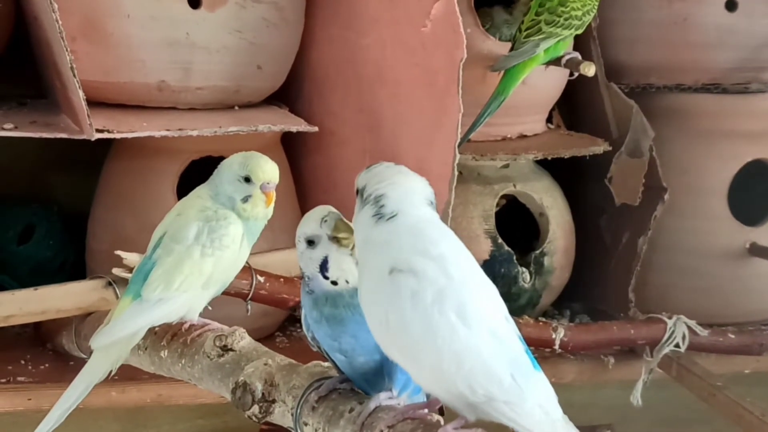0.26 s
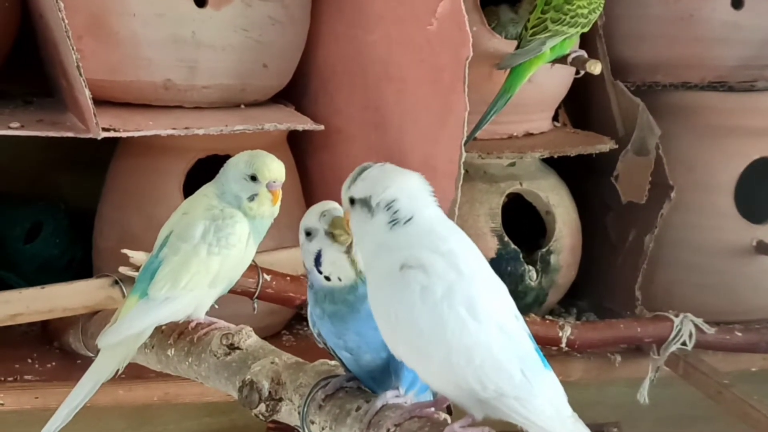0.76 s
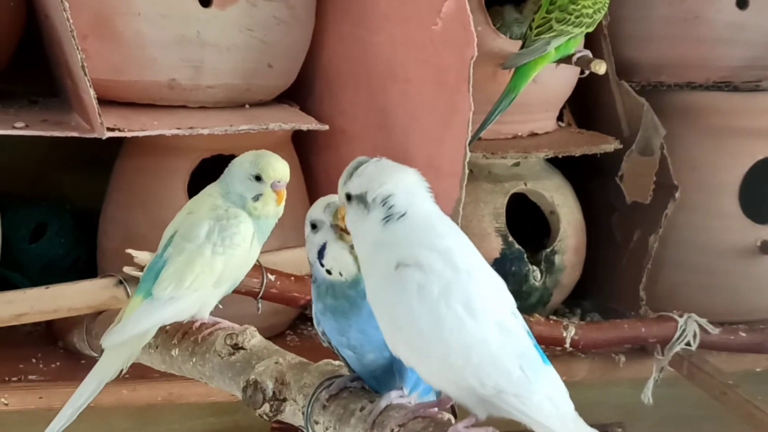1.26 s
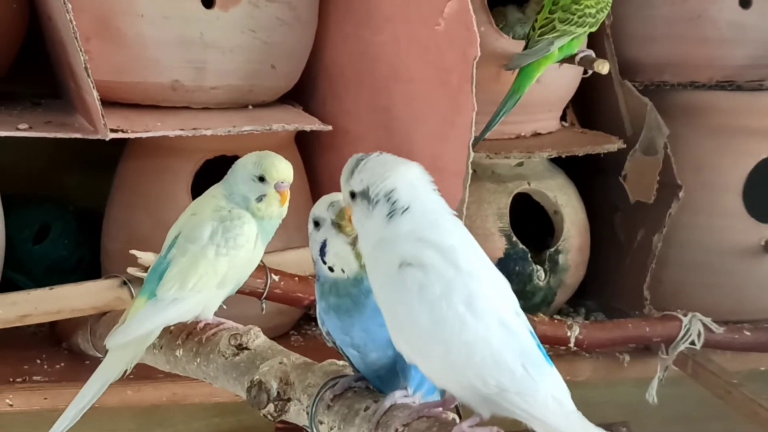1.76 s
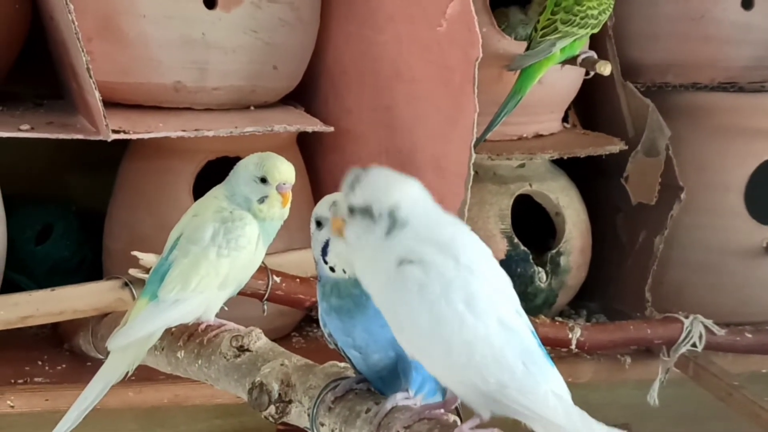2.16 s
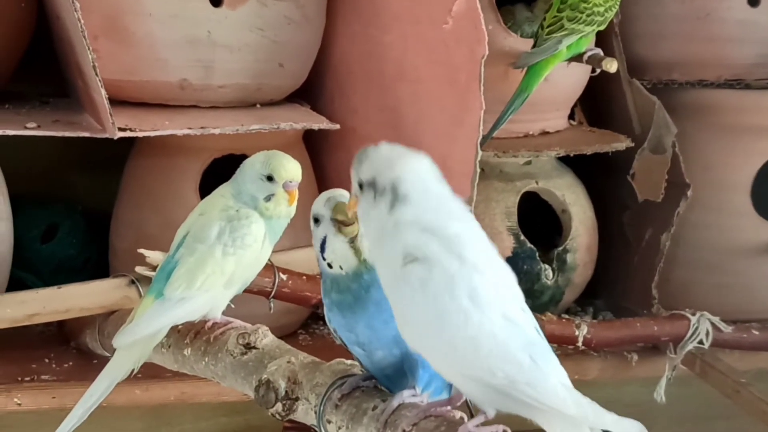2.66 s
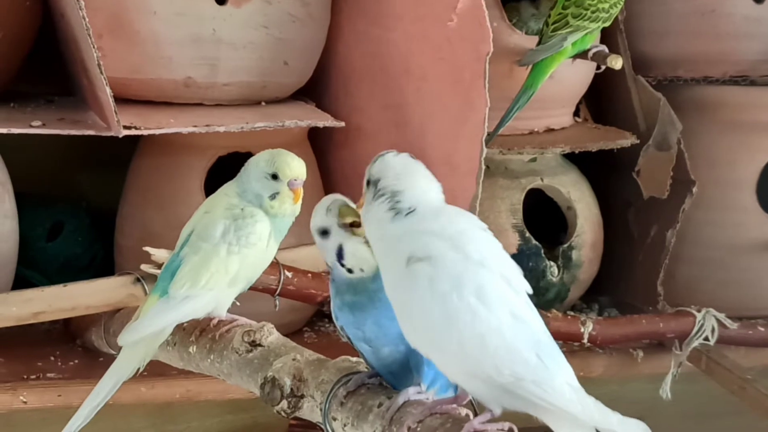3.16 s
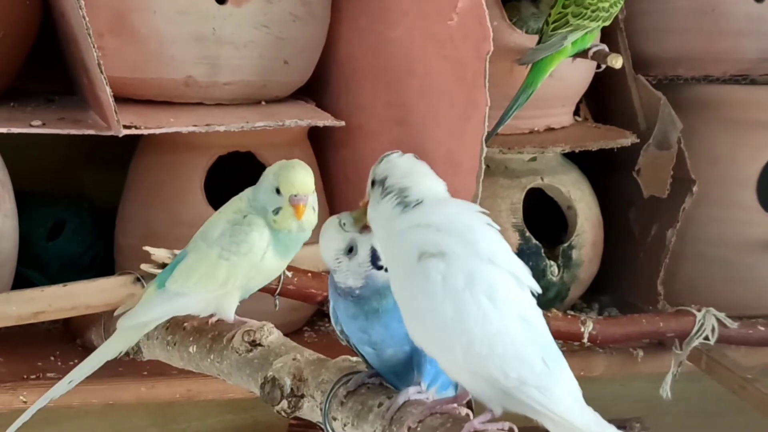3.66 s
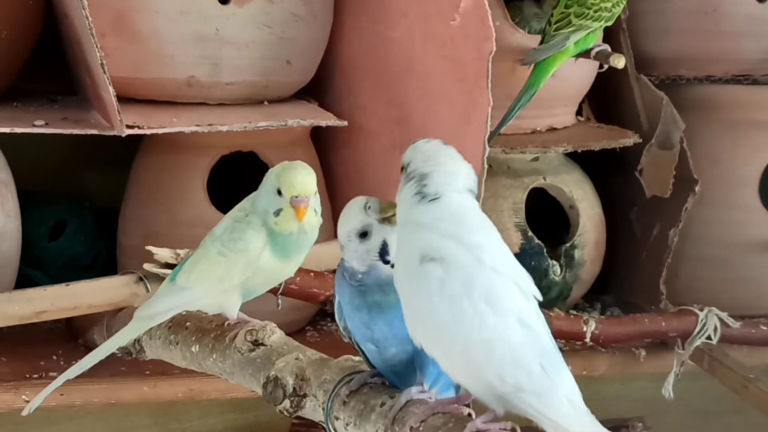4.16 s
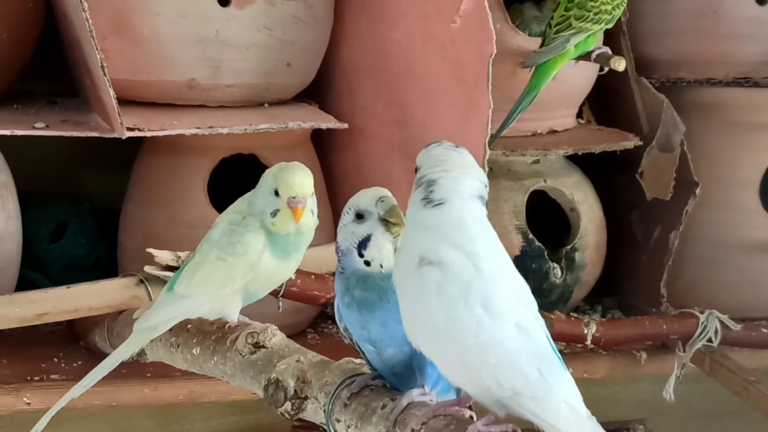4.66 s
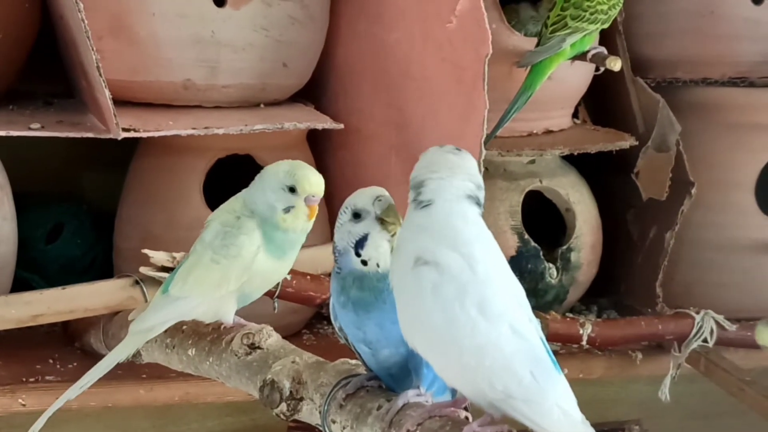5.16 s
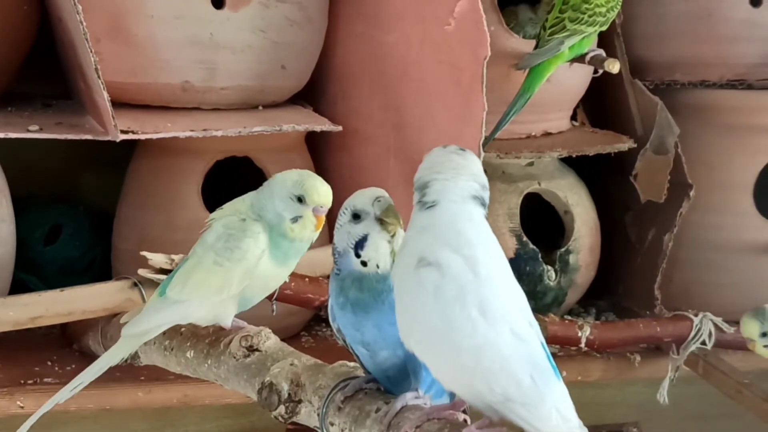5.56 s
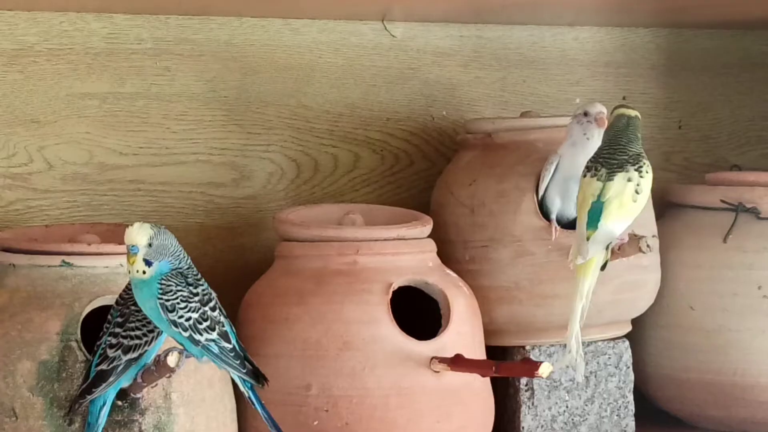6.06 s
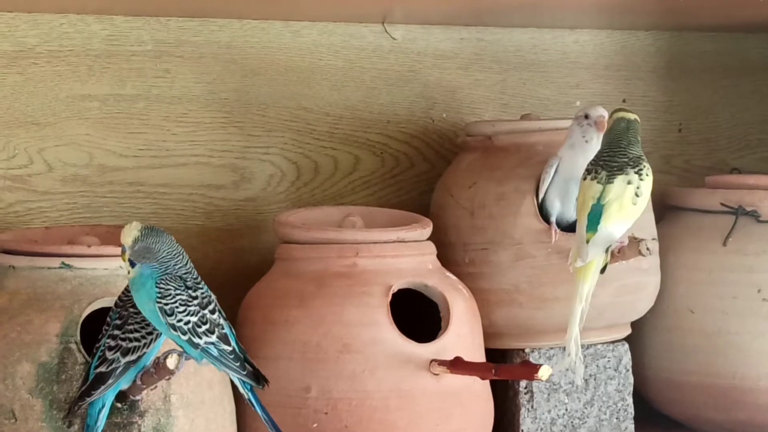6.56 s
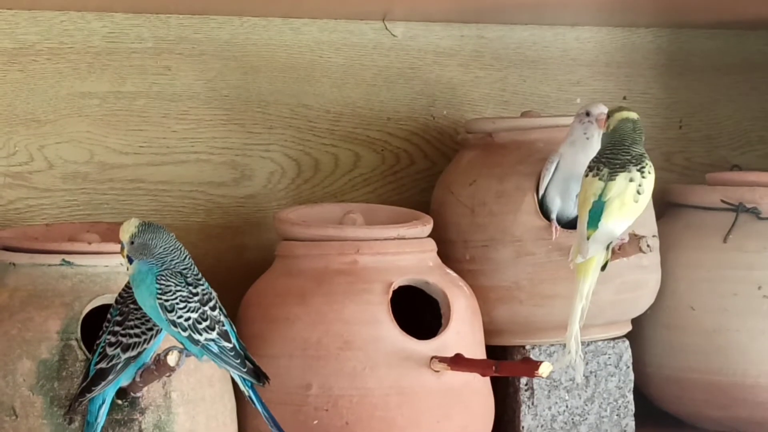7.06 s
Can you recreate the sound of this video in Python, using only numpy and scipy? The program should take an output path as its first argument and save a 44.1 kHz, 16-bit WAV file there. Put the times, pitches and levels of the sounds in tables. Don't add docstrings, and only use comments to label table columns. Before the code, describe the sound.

An aviary heard through a nearby phone microphone: steady airy hiss, a distant chirping flock and low, uneven wind puffs. A puff and short croak open, with a faint dove coo. From 0.3 to 1.7 seconds a near bird gives scratchy, buzzing rasps in quick succession, among soft whistles and dry beak ticks around 1.5. High fluttering trills start at 2.1 on the left and move to centre, answered ahead near 2.5. A clear whistle sounds left at 2.6, then a very loud, fast-gliding shriek at 2.7-2.85. Rasps return around 3-3.4, warbles fill 3.2-4.1, and more rasps run from 4.0 to 4.5. Wind thuds strongest at 4.6. Hard pecks come at 4.8 and 5.4, with a squawk near 5.5. Croaks, peeps and twitters continue from 5.9, ending with a bright chirp and falling squawk around 7.05 and small peeps. Hard walls and pots add brief echoes.

```python
import sys
import numpy as np
from scipy import signal
from scipy.io import wavfile
from scipy.ndimage import uniform_filter1d, minimum_filter1d

SR = 44100
rng = np.random.default_rng(int(sys.argv[2]) if len(sys.argv) > 2 else 0)


def unload_audio(sound):
    columns = np.transpose(np.atleast_2d(sound))
    steps = np.round(np.clip(columns, -1, 1) * 32767)
    wavfile.write(sys.argv[1], SR, steps.astype(np.int16))


def convert_level_to_amplitude(level_db):
    exponent = np.asarray(level_db, float) / 20
    return 10 ** exponent


N = 321489

# frequency in Hz, density in dB per Hz.
HISS_SPECTRUM = [(210, -62), (350, -41), (483, -23), (586, -5.5), (771, 2.5), (1450, 0), (1700, 2),
                 (2200, -2.5), (3340, -1.5), (5000, -3), (7490, -3), (15200, -10.5), (16500, -23)]
# frequency in Hz, likeness 0-1.
HISS_LIKENESS = [(300, 0.72), (600, 0.45), (2000, 0.67), (6000, 0.15), (14000, 0.062)]
# frequency in Hz, level in dB.
FAR_TONE = (1726, -55.5)
HISS_DB = -38
# peak in seconds, rise in seconds, fall in seconds, thud in dB, flutter in dB.
GUSTS = [
    (0.0, 0.02, 0.065, -45, -51),
    (0.45, 0.31, 0.65, -54.5, -56.5),
    (0.88, 0.44, 0.27, -48, -51),
    (1.97, 0.43, 0.3, -51.5, -54),
    (3.3, 0.76, 0.97, -65, -61),
    (4.22, 0.11, 1, -52.5, -51.5),
    (4.6, 0.42, 0.18, -41.5, -49.5),
    (5.15, 0.12, 0.14, -59, -56.5),
    (5.95, 0.082, 0.79, -63.5, -65),
    (7.1, 0.17, 0.12, -67, -59.5),
]
# thud in dB, flutter in dB.
CALM_DB = (-70, -71)
GUST_DROP_DB = -18.5
LULL_S, LULL_HALF_S, LULL_DB = 6.32, 0.043, -31
# time in seconds, level in dB.
FLOCK_LEVEL = [(0.0, -49), (4.5, -45.5), (4.9, -55), (5.6, -46)]
# start in seconds, length in seconds, from Hz, to Hz, level in dB.
DOVE = [
    (0.089, 0.063, 340, 300, -46.5),
    (0.16, 0.07, 343, 360, -56),
    (6.92, 0.042, 440, 450, -58),
    (6.945, 0.042, 630, 620, -50.5),
    (3.369, 0.26, 326, 321, -65),
]
# frequency in Hz, t60 in seconds.
WALL_T60 = [(500, 0.047), (3000, 0.39), (7000, 0.31), (14000, 0.054)]

# frequency in Hz, gain in dB.
MOUTH = [(2500, 3), (5000, 6), (7500, 1), (12500, -5.5), (14500, -23)]
KNEE, EARLY_GLIDE, START_DB, END_DB = 0.35, 0.621, 0, -4

# start in seconds, length in seconds, from Hz, to Hz, level in dB.
COOS = [(0.245, 0.02, 1350, 1590, -39), (0.263, 0.027, 1570, 1170, -41), (0.34, 0.045, 1468, 1453, -39),
        (0.378, 0.029, 1786, 1543, -35.5), (0.41, 0.06, 1494, 1474, -43.5), (1.14, 0.087, 831, 862, -45),
        (1.255, 0.097, 800, 863, -49), (1.38, 0.067, 820, 870, -47), (1.46, 0.13, 898, 830, -49),
        (3.68, 0.04, 1554, 1620, -45.5), (5.31, 0.12, 1500, 1180, -50.5), (1.59, .06, 800, 738, -49.5),
        (2.5, 0.044, 1680, 1780, -38), (2.96, 0.025, 1480, 1460, -41), (5.96, 0.029, 2110, 1920, -38),
        (6.215, 0.03, 2500, 2210, -41), (6.25, 0.1, 2190, 2300, -42.5), (6.22, 0.052, 1113, 1200, -42),
        (7.02, 0.069, 2474, 2570, -43)]
# start in seconds, length in seconds, from Hz, to Hz, level in dB.
WARBLES = [(0.0, 0.064, 2890, 2984, -42), (0.167, 0.053, 3054, 2870, -40), (1.228, 0.07, 2940, 3030, -39.5),
           (1.43, 0.018, 3580, 2790, -36.5), (1.948, 0.024, 3910, 3630, -38.5),
           (4.706, 0.036, 2490, 2440, -42.5), (3.185, 0.035, 3650, 3460, -41.5),
           (3.221, 0.07, 3400, 3340, -38), (3.31, 0.06, 3200, 3050, -42), (3.434, 0.04, 3390, 3270, -39),
           (3.478, 0.05, 3330, 2890, -39), (3.53, 0.043, 2850, 2730, -39), (3.452, 0.02, 2800, 2780, -38),
           (3.659, 0.072, 3060, 3160, -37.5), (3.7, 0.054, 3150, 2730, -39), (3.732, 0.05, 2140, 2430, -38),
           (3.78, 0.075, 2150, 2480, -39.5), (3.87, 0.051, 2260, 2480, -42), (3.652, 0.03, 4000, 4100, -44),
           (3.778, 0.021, 2650, 3510, -30), (3.786, 0.016, 3300, 4220, -33),
           (3.987, 0.032, 2620, 2240, -41), (4.02, 0.047, 2360, 2740, -45),
           (4.063, 0.04, 2760, 2374, -39.5)]
# start in seconds, length in seconds, from Hz, to Hz, level in dB.
TWITTERS = [(5.163, 0.016, 4300, 4200, -37), (5.563, 0.035, 3500, 3120, -37.5),
            (5.872, 0.012, 4070, 4180, -33), (5.941, 0.024, 2300, 3430, -32.5),
            (5.995, 0.02, 2530, 2670, -32), (6.008, 0.02, 2650, 3300, -38), (6.014, 0.018, 6400, 6500, -31),
            (6.089, 0.018, 3670, 3680, -38), (6.177, 0.035, 3050, 2940, -45),
            (6.514, 0.018, 3980, 3650, -39), (6.57, 0.042, 2670, 2900, -41),
            (6.779, 0.083, 3420, 3290, -45), (7.02, 0.024, 3900, 3830, -33),
            (7.041, 0.028, 3904, 4794, -27.5), (7.064, 0.0305, 4800, 4400, -35),
            (7.209, 0.02, 3050, 2900, -37.5), (7.229, 0.019, 2950, 3320, -35.5),
            (5.885, 0.023, 3360, 2850, -36), (5.906, 0.077, 4760, 4660, -42)]
# start in seconds, length in seconds, from Hz, to Hz, level in dB.
CHIRPS = [(1.6, 0.017, 3350, 3330, -37), (1.29, 0.046, 2580, 2620, -42), (1.5, 0.063, 2780, 3000, -47),
          (1.31, 0.032, 3700, 3100, -36.5), (1, .06, 3200, 3300, -40), (1.2, 0.027, 2800, 3100, -44),
          (1.56, 0.036, 2750, 3300, -46), (1.195, 0.022, 2500, 2600, -37), (1.965, .04, 3700, 3100, -46),
          (2.2, .1, 3950, 3850, -47.5), (2.06, .025, 3200, 2750, -43), (2.078, .04, 2450, 2250, -45),
          (1.923, 0.011, 7000, 5100, -45), (2.335, 0.041, 3350, 3250, -45), (5.855, .025, 2550, 2750, -45),
          (5.5, 0.014, 2300, 1900, -41), (5.972, .02, 4300, 4600, -39), (6.003, 0.014, 5300, 5000, -36),
          (6.065, 0.0246, 2700, 3200, -40), (5.878, 0.013, 8500, 6800, -38),
          (6.035, 0.038, 5800, 6400, -41), (6.612, .02, 5150, 5200, -40.5), (6.715, .015, 4800, 5000, -43),
          (6.65, 0.031, 3150, 3050, -41.5), (6.99, 0.029, 5450, 5300, -49), (6.4, 0.022, 3400, 3000, -38),
          (7.065, .03, 3000, 3600, -36), (0.97, .07, 2750, 2850, -45), (6, .025, 3100, 2500, -42),
          (3.715, .025, 4200, 4500, -41), (3.9, .025, 3500, 3300, -44), (3.905, .03, 3300, 3320, -48),
          (4.115, .05, 2050, 1900, -46), (4.7, .025, 2600, 2300, -40), (4.59, 0.029, 2450, 2650, -41),
          (5.27, .04, 3100, 2900, -42), (5.545, 0.018, 3650, 3400, -42), (6.88, 0.029, 2500, 2650, -45)]
# start in seconds, length in seconds, from Hz, to Hz, level in dB.
LEFT_WHISTLES = [
    (1.95, 0.11, 8120, 8110, -38),
    (2.02, 0.041, 7900, 7770, -44),
    (2.583, 0.086, 4136, 4137, -22.5),
    (2.665, 0.13, 4190, 4140, -35),
    (2.79, 0.18, 4154, 4170, -40.5),
    (3.88, 0.03, 4540, 4520, -48),
    (3.75, 0.05, 4700, 4700, -47),
]
# start in seconds, length in seconds, from Hz, to Hz, level in dB.
RIGHT_PEEPS = [(5.315, 0.0276, 5150, 4880, -43), (5.6, 0.036, 5050, 4890, -40.5),
               (5.69, 0.03, 3750, 4070, -42), (5.76, 0.051, 5310, 4880, -44.5),
               (6.185, 0.028, 4250, 4410, -49), (6.235, 0.07, 4550, 5150, -45),
               (6.43, 0.045, 2730, 3350, -42), (6.47, 0.03, 3320, 3100, -45),
               (6.79, 0.013, 4870, 4700, -41), (7.215, 0.027, 8110, 7730, -41),
               (7.26, 0.044, 7680, 7350, -38)]
AHEAD_PAN_DB, LEFT_PAN_DB, RIGHT_PAN_DB = 1, 14, -16
CLEAR_DB, CLEAR_SWELL_DB = -30, -5

# start in seconds, length in seconds, from Hz, to Hz, level in dB.
TRILLS = [(2.112, 0.128, 6110, 6080, -35), (2.235, 0.117, 6190, 6000, -40.5),
          (2.128, 0.108, 5820, 5690, -39.5), (2.28, 0.049, 3800, 4150, -39),
          (2.315, 0.067, 4150, 3950, -29.5), (2.375, 0.068, 3950, 4050, -35.5),
          (2.295, 0.077, 4300, 4250, -36), (2.385, 0.12, 4300, 4250, -41), (2.5, 0.12, 3800, 3780, -41),
          (2.8, 0.076, 4300, 3950, -41), (2.15, 0.083, 6350, 6400, -39), (2.13, 0.08, 5560, 5540, -45),
          (3, 0.081, 5330, 5350, -43), (2.44, 0.058, 5330, 5720, -29), (2.491, 0.12, 5770, 5770, -35),
          (2.62, 0.071, 5760, 5750, -45)]
# start in seconds, length in seconds, from Hz, to Hz, level in dB.
ANSWER = [
    (2.438, 0.035, 3720, 3570, -33.5),
    (2.47, 0.034, 3080, 3620, -31),
    (2.497, 0.0324, 3630, 3607, -24.5),
    (2.543, 0.047, 3630, 3690, -40),
]
TURN_FROM_DB, TURN_S, TURN_DB_PER_S = 19, 2.11, -21
# start in seconds, length in seconds, from Hz, to Hz, level in dB.
SQUAWKS = [
    (7.05, 0.06, 4600, 4250, -32),
    (1.52, 0.025, 2600, 3250, -40.5),
    (5.468, 0.022, 3300, 2600, -27.5),
]
# time in seconds, level in dB.
TICKS = [
    (1.446, -17),
    (1.548, -18),
    (1.61, -18),
    (1.8287, -21),
    (3.457, -20),
    (4.815, -15),
    (5.096, -17),
    (5.408, -12.5),
    (6.949, -22),
]
# start in seconds, length in seconds, from Hz, to Hz, level in dB.
CALL = [(2.692, 0.01, 2750, 2630, -38), (2.699, 0.0061, 3400, 5340, -28),
        (2.707, 0.0037, 5130, 4960, -18.5), (2.71, 0.004, 3900, 5300, -22),
        (2.7138, 0.0081, 5230, 4700, -17.5), (2.723, 0.014, 4630, 5030, -21.5),
        (2.735, 0.013, 4220, 2750, -34), (2.748, 0.034, 2680, 2415, -26), (2.7793, 0.006, 3200, 5700, -9),
        (2.7845, 0.0073, 6300, 5780, -13), (2.7916, 0.0056, 5900, 3220, -19),
        (2.796, 0.004, 3300, 4700, -28), (2.797, 0.0101, 4760, 5130, -18), (2.805, 0.006, 5000, 4680, -18),
        (2.812, 0.032, 5060, 4790, -23.5), (2.84, 0.031, 4800, 4360, -24)]
LOW_TILT_DB, TILT_DB_PER_OCTAVE, LOW_HZ = -1.5, -2, 2500
TIRING_DB_PER_S = -57

# start in seconds, length in seconds, beak ring in dB, throat ring in dB,
# throat ring in Hz.
CROAKS = [(0.022, 0.019, -50, -36.5, 3750), (0.163, 0.078, -43.5, -34, 3500),
          (2.699, 0.026, -38, -29, 4600), (2.777, 0.011, -24, -23, 4800), (3.793, 0.036, -43, -31, 3490),
          (5.148, 0.035, -35.5, -32.5, 3310), (5.248, 0.019, -37, -27.5, 3780),
          (5.436, 0.048, -32, -39, 4800), (5.466, 0.019, -35, -24, 4506), (5.872, 0.084, -46, -34.5, 4090),
          (5.95, 0.097, -43, -33.5, 3500), (6.359, 0.09, -35, -37.5, 4100),
          (6.453, 0.042, -36.5, -37, 3760), (6.605, 0.12, -43, -37, 3610), (7.055, 0.032, -42, -29, 4410),
          (2.803, 0.03, -39, -32.5, 3590)]
# beak ring in Hz, place of the throat peak 0-1, overtone in dB.
CROAK_COLOUR = (6570, 0.18, -22)
CROAK_PEAK = 0.15
# start in seconds, length in seconds, place of the peak 0-1, beak ring in dB, throat ring in dB.
RASPS = [(0.315, 0.099, 0.5, -25.5, -30), (0.465, 0.033, 0.4, -25.5, -31), (0.505, 0.053, 0.4, -30, -29.5),
         (0.561, 0.064, 0, -32.5, -28), (0.621, 0.067, 0.46, -27.0, -22.5),
         (0.719, 0.048, 0.24, -34, -26.5), (0.765, 0.043, 0.4, -28, -26), (0.81, 0.09, 0.2, -31.5, -30.5),
         (0.932, 0.12, 0.02, -25.5, -27.5), (1.056, 0.12, 0.23, -27, -25.5),
         (1.183, 0.08, 0.42, -26, -27.5), (1.315, 0.065, 0.3, -26.0, -28),
         (1.618, 0.044, 0.48, -24.5, -33.5), (1.666, 0.061, 0, -30.5, -31),
         (2.962, 0.09, 0.46, -37.5, -29.5), (3.211, 0.072, 0.46, -28, -28.5),
         (3.327, 0.055, 0.63, -25, -32.5), (3.391, 0.064, 0.2, -33.5, -33),
         (4.016, 0.055, 0.15, -28.0, -31.5), (4.127, 0.062, 0.14, -24.5, -29.0),
         (4.19, 0.035, 0.57, -27.5, -30.5), (4.247, 0.04, 0.56, -25.0, -29.5),
         (4.43, 0.028, 0.4, -32.5, -29.5), (4.455, 0.047, 0.23, -27.0, -26.5)]
# beak ring in Hz, throat ring in Hz, place of the throat peak 0-1, overtone in dB.
RASP_COLOURS = [(6500, 3960, 0.57, -23.0), (6520, 4140, 0.4, -26.0), (6530, 4240, 0.3, -20),
                (6480, 3960, 1.0, -23.0), (6700, 3840, 0.6, -20), (6660, 4220, 0.3, -21.0),
                (6400, 3920, 0.2, -15), (6360, 3800, 0.15, -20), (6300, 4410, 0.1, -21),
                (6600, 4200, 0.23, -22.0), (6390, 4010, 0.93, -25.0), (6800, 3730, 0.23, -27),
                (6620, 3840, 0.75, -21), (6480, 3880, 0.3, -22.0), (6640, 4290, 0.3, -23.0),
                (6570, 3660, 0.73, -27.0), (6400, 3710, 0.33, -23), (6300, 3610, 0, -26.0),
                (6650, 4120, 0.2, -26.0), (6830, 4210, 0.06, -23.0), (6850, 3560, 0.56, -27.0),
                (6060, 4450, 0.4, -20.0), (6790, 3610, 0.8, -14.0), (6050, 3840, 0.44, -17)]
LOW_RING = (.7, 0.26)
HIGH_RING = (1.215, 0.21)
RISE_DB_PER_S, FALL_DB_PER_S = 192, 102
ATTACK_SHARE = 0.32


def evened(x):
    return x / np.sqrt(np.mean(x ** 2) + 1e-20)


def read(points, hz):
    f, value = np.transpose(points)
    return np.interp(np.log(hz + 1), np.log(f + 1), value)


def drift(count, span_s):
    size = max(int(span_s * SR), 1)
    once = uniform_filter1d(rng.standard_normal(count), size)
    return evened(uniform_filter1d(once, size))


def band(x, lo_hz, hi_hz):
    sos = signal.butter(4, [lo_hz, hi_hz], "band", fs=SR, output="sos")
    return evened(signal.sosfilt(sos, x))


def resonate(x, hz, width_hz):
    turn = np.exp(2j * np.pi * np.cumsum(hz * np.ones(len(x))) / SR)
    r = np.exp(-np.pi * width_hz / SR)
    smoothed = signal.lfilter([1], np.convolve([1, -r], [1, -r]), x / turn)
    return evened((turn * smoothed).real)


def add(mix, s, sound, pan_db=0):
    gains = convert_level_to_amplitude(np.array([[pan_db / 2], [-pan_db / 2]]))
    if abs(pan_db) > 15:
        gains[int(pan_db > 0)] *= -1
    part = mix[:, round(s * SR):][:, :len(sound)]
    part += sound[:part.shape[1]] * gains / gains.mean()


def outdoors():
    hz = np.fft.rfftfreq(1024, 1 / SR)[:, None]
    a, b, c, d, patches = rng.standard_normal((N // 256 + 5, len(hz), 5)).T
    patches = uniform_filter1d(patches, size=10, axis=0)
    patches = evened(uniform_filter1d(patches, size=12, axis=1))
    same = np.clip(read(HISS_LIKENESS, hz), 0, 1)
    shared = np.sqrt(1 + same) * (a + 1j * b)
    opposed = np.sqrt(1 - same) * (c + 1j * d)
    z = np.array([shared + opposed, shared - opposed])
    z = z * convert_level_to_amplitude(read(HISS_SPECTRUM, hz) + 1.9 * patches)
    hiss = evened(signal.istft(z, nperseg=1024, noverlap=768)[1][:, :N])
    tone_hz, tone_db = FAR_TONE
    tone = resonate(rng.standard_normal(N), tone_hz, 15.0)
    return convert_level_to_amplitude(HISS_DB) * hiss + convert_level_to_amplitude(tone_db) * tone


def wind():
    t = np.arange(N) / SR
    power = convert_level_to_amplitude(np.array(CALM_DB))[:, None] ** 2 * np.ones(N)
    for s, rise, fall, *levels_db in GUSTS:
        swell = convert_level_to_amplitude(GUST_DROP_DB * abs(t - s) / np.where(t < s, rise, fall))
        power += convert_level_to_amplitude(np.array(levels_db))[:, None] ** 2 * swell ** 2
    lull = convert_level_to_amplitude(LULL_DB * np.clip(1 - abs(t - LULL_S) / LULL_HALF_S, 0, 1))
    lumps = rng.standard_normal(N) * convert_level_to_amplitude(2 * drift(N, 0.015))
    thud = resonate(lumps, 106.5, 54) + 1.9 * band(lumps, 64, 223)
    flutter = band(lumps, 186, 558) + 0.22 * resonate(lumps, 320.0, 92)
    return lull * (evened(thud) * np.sqrt(power[0]) + evened(flutter) * np.sqrt(power[1]))


def walls(x, side_db):
    taps = np.zeros((2, SR // 2))
    at = np.arange(200, SR // 2 - 20, 20) + rng.integers(0, 20, (2, 1092))
    np.put_along_axis(taps, at, rng.choice([-1., 1.], at.shape), 1)
    hz, t, z = signal.stft(taps, SR, nperseg=256)
    decay = convert_level_to_amplitude(-60 * t / read(WALL_T60, hz)[:, None])
    mid, side = signal.istft(z * decay, SR, nperseg=256)[1]
    tail = np.array([mid + convert_level_to_amplitude(side_db) * side, mid - convert_level_to_amplitude(side_db) * side])
    return signal.fftconvolve(x, tail / np.linalg.norm(tail[0]), axes=1)[:, :N]


def pots(x):
    out = x.copy()
    for lag, left, right in [(70, .35, -.2), (190, -.2, .3), (660, .3, .25)]:
        out[:, lag:] += np.array([[left], [right]]) * x[:, :-lag]
    return out


def note(rows, tilt_db, wobble, flutter, edge_s, air_db=-30):
    s, hz, db = np.transpose(rows)
    t = np.arange(s[0], s[-1], 1 / SR)
    hz = uniform_filter1d(np.interp(t, s, hz), size=60) * (1 + wobble * drift(len(t), 0.0055))
    phase = 2 * np.pi * np.cumsum(hz) / SR
    tone = 0
    for k in range(1, 6):
        tone = tone + convert_level_to_amplitude((k - 1) * tilt_db + read(MOUTH, k * hz)) * np.sin(k * phase)
    tone *= 1 + convert_level_to_amplitude(air_db) * drift(len(t), .0003)
    chop_hz = 150 * convert_level_to_amplitude(2.72 * drift(len(t), 0.012))
    chop = 1 + flutter * np.sin(2 * np.pi * np.cumsum(chop_hz) / SR)
    fade = np.clip(np.minimum(t - s[0], s[-1] - t) / edge_s, 0, 1)
    return s[0], np.sqrt(2) * convert_level_to_amplitude(np.interp(t, s, db)) * tone * chop * fade


def glide(s, length, from_hz, to_hz, db):
    knee_hz = from_hz + EARLY_GLIDE * (to_hz - from_hz)
    return [(s, from_hz, db + START_DB), (s + KNEE * length, knee_hz, db), (s + length, to_hz, db + END_DB)]


def flock():
    out = np.zeros((2, N))
    for place, height, bend, length, size, pan in rng.random((300, 6)):
        start = place * N / SR
        end = start + .01 + .025 * length
        hz = 2000 * 2 ** (1.2 * height ** 1.5)
        rows = [(start, hz, -6 * size), (end, hz * (.7 + .6 * bend), -6 * size)]
        add(out, *note(rows, -18, .02, .6, .005, -14), 30 * pan - 15 - 10 * place)
    return evened(out) * convert_level_to_amplitude(np.interp(np.arange(N) / SR, *np.transpose(FLOCK_LEVEL)))


def dove(mix):
    for row in DOVE:
        add(mix, *note(glide(*row), -25, .04, 0, .02))


def whistlers(far, clear):
    ahead = COOS + WARBLES + TWITTERS + CHIRPS
    groups = [(ahead, AHEAD_PAN_DB, .32), (LEFT_WHISTLES, LEFT_PAN_DB, .1), (RIGHT_PEEPS, RIGHT_PAN_DB, .3)]
    for table, pan_db, rough in groups:
        for row in table:
            s, length, from_hz, to_hz, db = row
            if db > CLEAR_DB and pan_db == LEFT_PAN_DB:
                rows = [(s, from_hz, db + CLEAR_SWELL_DB), (s + .027, to_hz, db), (s + length, to_hz + 40, db)]
                add(clear, *note(rows, -40, .003, .12, .012), pan_db)
            else:
                add(far, *note(glide(*row), -30, .045 * rough, 1.3 * rough, .005), pan_db)


def trillers(mix):
    turning = [(row, TURN_FROM_DB + TURN_DB_PER_S * (row[0] - TURN_S)) for row in TRILLS]
    for row, pan_db in turning + [(row, 0) for row in ANSWER]:
        add(mix, *note(glide(*row), -29, 0.0061, 0.44, 0.0079, -22.0), pan_db)


def squawks(mix):
    for row in SQUAWKS:
        add(mix, *note(glide(*row), -5.5, 0.0322, 0.61, 0.0017, -16.0))


def beak_ticks(mix):
    for s, db in TICKS:
        add(mix, s, convert_level_to_amplitude(db - 7.5) * rng.standard_normal(80) * np.exp(-np.arange(80) / 14.0))


def near_call(mix):
    tiring_from_s = CALL[7][0]
    for row in CALL:
        tilt_db = LOW_TILT_DB + TILT_DB_PER_OCTAVE * np.log2(row[3] / LOW_HZ)
        tilt_db += TIRING_DB_PER_S * max(row[0] - tiring_from_s, 0)
        add(mix, *note(glide(*row), tilt_db, .008, .3, .0012, -14))


def rasp(s, length, peak, beak_db, throat_db, beak_hz, throat_hz, throat_peak, overtone_db):
    t = np.arange(round((length + .04) * SR)) / SR
    count = len(t)
    turns = np.cumsum(275 * convert_level_to_amplitude(3.5 * drift(count, .004))) / SR + .7
    slaps = np.diff(np.floor(turns), prepend=0) * convert_level_to_amplitude(1.5 * drift(count, 0.003))
    puffs = evened(np.convolve(slaps, np.hanning(120), "same")) + .22

    air = puffs * rng.standard_normal(count)
    ring_hz = beak_hz * (1 + .035 * drift(count, .002) + .006 * drift(count, .04))
    ring = np.sin(2 * np.pi * np.cumsum(ring_hz) / SR)
    beak = evened(puffs * ring + .6 * resonate(air, beak_hz, 1200))
    breathy = (puffs + 1.2) * rng.standard_normal(count)
    overtone = resonate(breathy, 13100, 900) + .9 * band(breathy, 13800, 14400)
    overtone = evened(overtone + .55 * resonate(breathy, 11900, 500))
    upper = beak + convert_level_to_amplitude(-10.5) * band(air, 7270, 8580) + convert_level_to_amplitude(overtone_db + 1.0) * overtone

    croak_hz = throat_hz * (1.03 - .5 * t + .11 * drift(count, .004))
    croak = np.sin(2 * np.pi * np.cumsum(croak_hz) / SR)
    steady = (puffs + 2.8) * rng.standard_normal(count)
    throat = .45 * (puffs + .8) * croak
    throat += .45 * resonate(steady, throat_hz, 700) + .42 * band(steady, 2500, 5900)
    for multiple, share in (LOW_RING, HIGH_RING):
        throat += share * resonate(steady, multiple * throat_hz, 400)
    throat = evened(throat)

    late = t - np.clip([[peak], [throat_peak]], 0, 1) * length
    swell = convert_level_to_amplitude(-abs(late) * np.where(late < 0, RISE_DB_PER_S, FALL_DB_PER_S))
    opening = np.clip(t / np.clip(ATTACK_SHARE * peak * length, .003, .02), 0, 1)
    closing = np.clip(1 + (length - t) / 0.014, 0, 1)
    voice = convert_level_to_amplitude(beak_db + 2.5) * swell[0] * upper + convert_level_to_amplitude(throat_db) * swell[1] * throat
    return s, opening * closing * voice


def raspers(mix):
    for row, colour in zip(RASPS, RASP_COLOURS):
        add(mix, *rasp(*row, *colour))
    beak_hz, throat_peak, overtone_db = CROAK_COLOUR
    for s, length, beak_db, throat_db, throat_hz in CROAKS:
        croak = rasp(s, length, CROAK_PEAK, beak_db, throat_db, beak_hz, throat_hz, throat_peak, overtone_db)
        add(mix, *croak, -3 if s > 5.4 else 0)


def scene():
    rasps, near, far, clear = np.zeros((4, 2, N))
    distant = flock()
    whistlers(far, clear)
    trillers(far)
    squawks(far)
    beak_ticks(near)
    near_call(near)
    raspers(rasps)
    far = convert_level_to_amplitude(-1.5) * far
    wet = convert_level_to_amplitude(-17) * near + convert_level_to_amplitude(-19) * clear + convert_level_to_amplitude(-7.5) * far + distant
    facing = rasps + convert_level_to_amplitude(-8) * walls(rasps, -11)
    birds = facing + pots(near) + clear + far + convert_level_to_amplitude(-1.0) * distant + walls(wet, -6.0)
    no_bass = signal.butter(6, 650, "high", fs=SR, output="sos")
    birds = signal.sosfilt(no_bass, birds)
    dove(birds)
    return birds + wind() + outdoors()


def roll_off(x):
    return signal.sosfilt(signal.butter(12, 17040, fs=SR, output="sos"), x)


def record(dry):
    limit = np.minimum(.9 / (abs(dry).max(0) + 1e-9), 1)
    limit = minimum_filter1d(limit, size=200)
    dry = dry * uniform_filter1d(limit, size=200)
    mid, side = dry[0] + dry[1], dry[0] - dry[1]
    mid = signal.sosfilt(signal.butter(3, 80, "high", fs=SR, output="sos"), mid)
    side = signal.sosfilt(signal.butter(6, 480, "high", fs=SR, output="sos"), side)
    edge = signal.firwin(301, 15900, window=("kaiser", 9), fs=SR)
    heard = signal.oaconvolve(np.array([mid + side, mid - side]) / 2, edge[None], "same")
    return roll_off(heard)


dry = scene()
out = record(dry)
unload_audio(out)
```